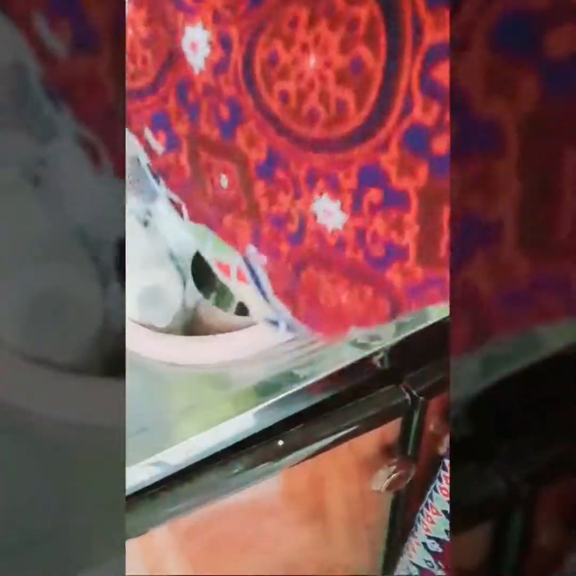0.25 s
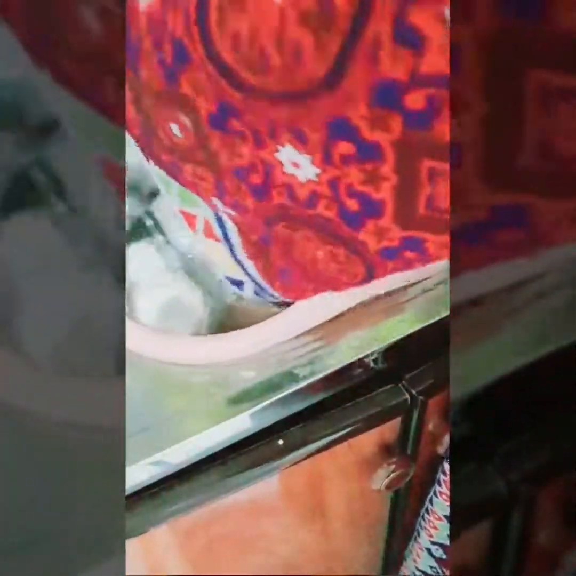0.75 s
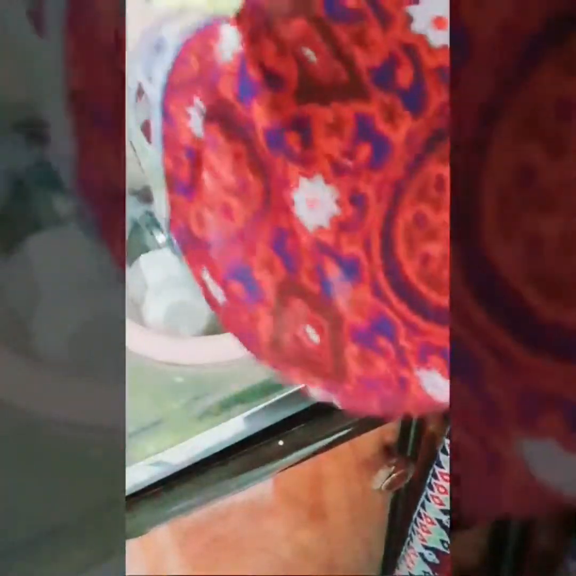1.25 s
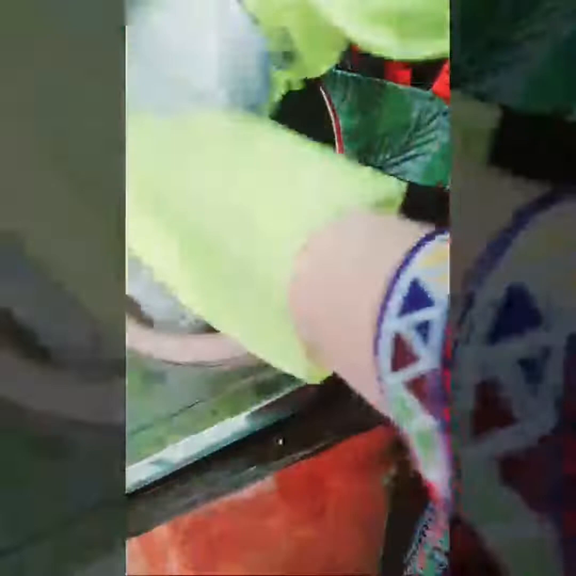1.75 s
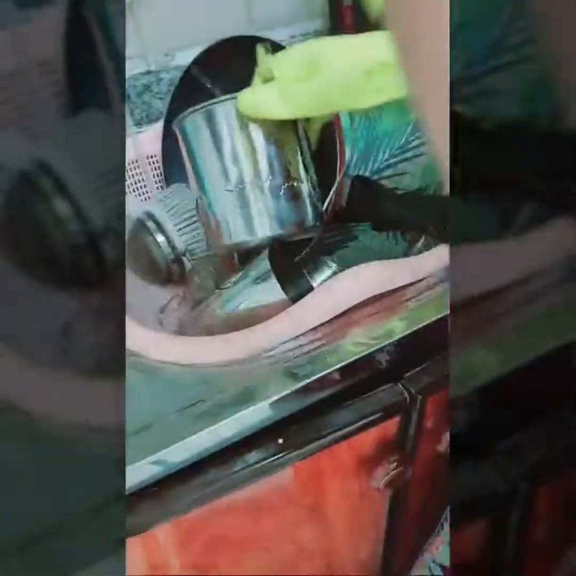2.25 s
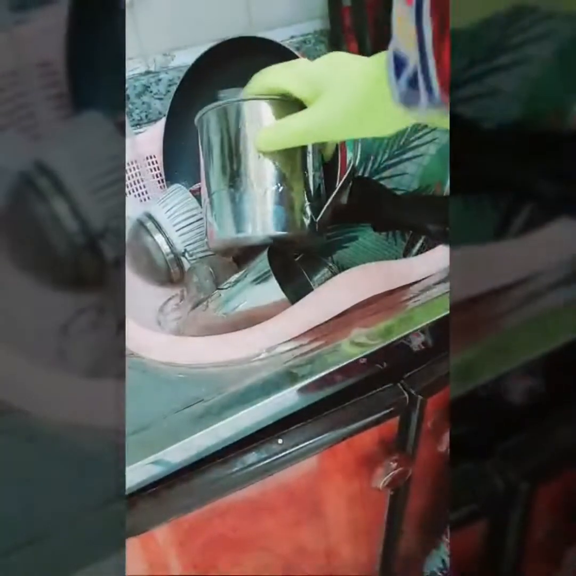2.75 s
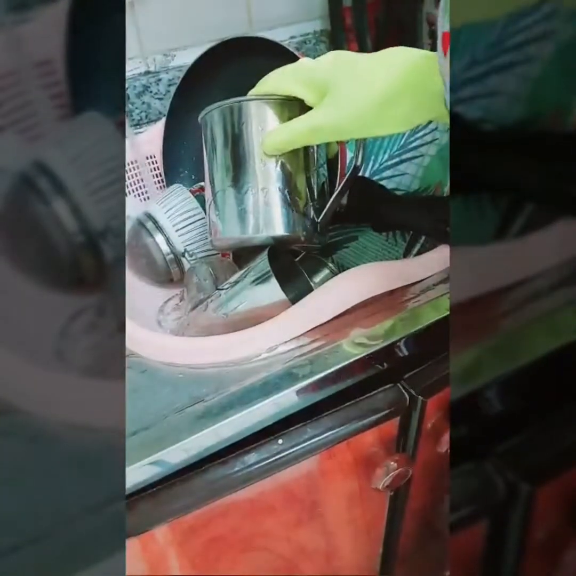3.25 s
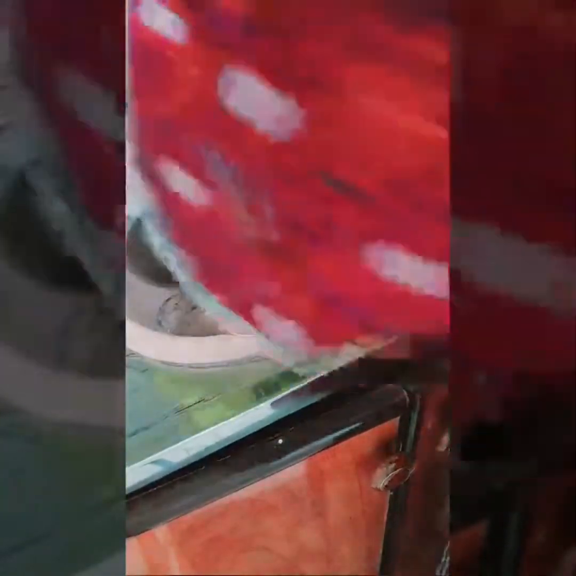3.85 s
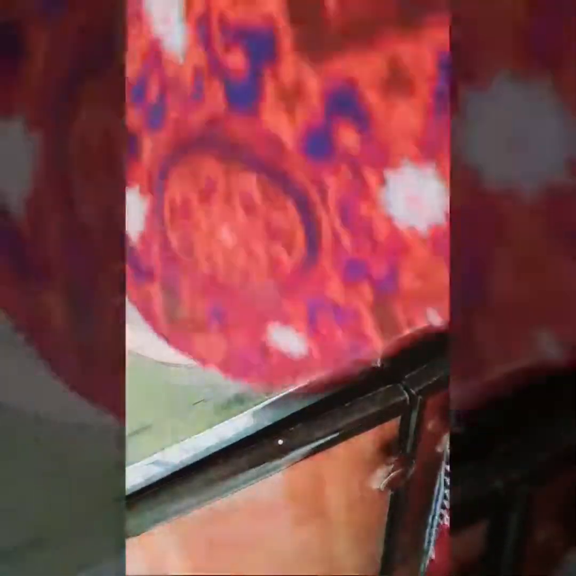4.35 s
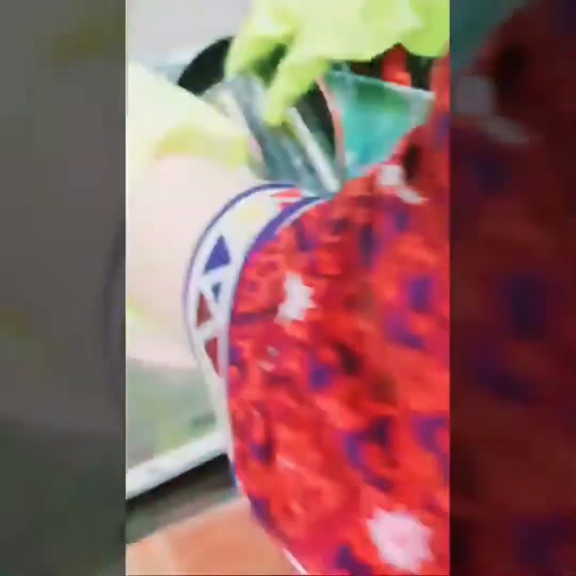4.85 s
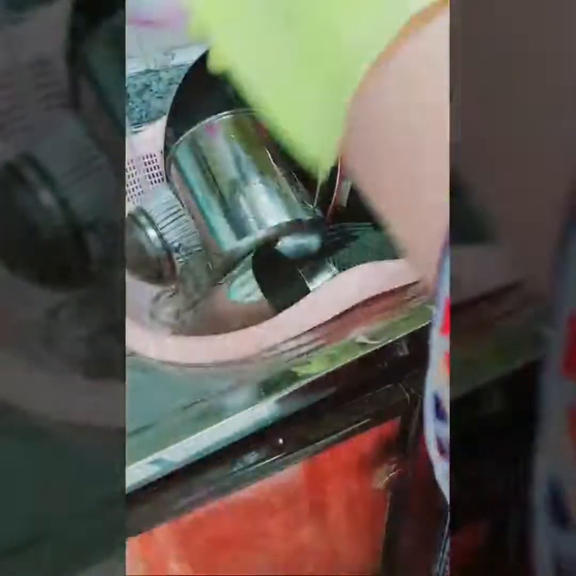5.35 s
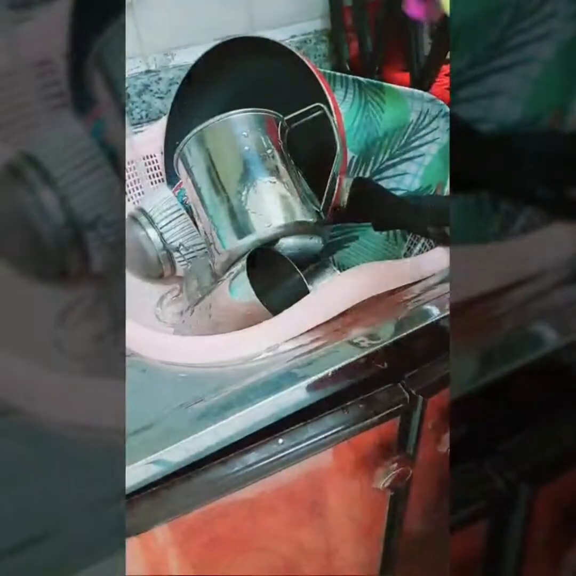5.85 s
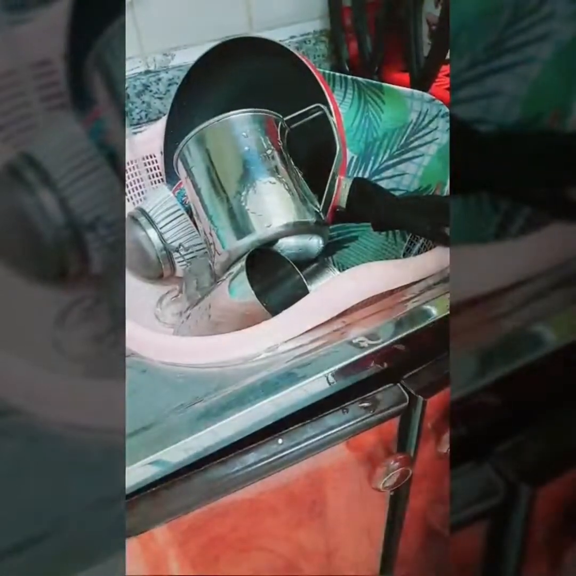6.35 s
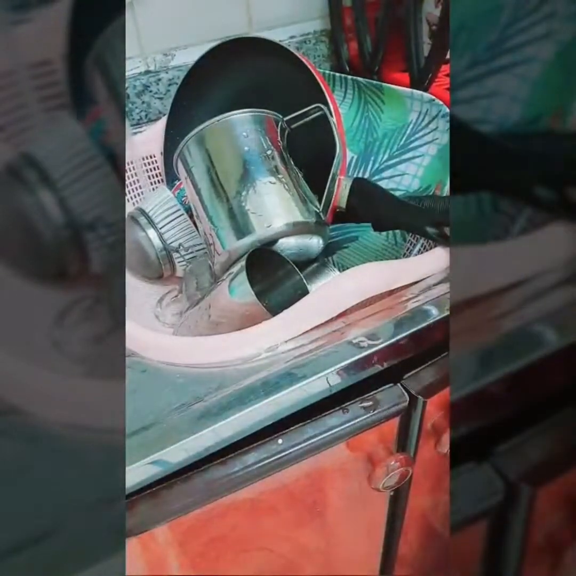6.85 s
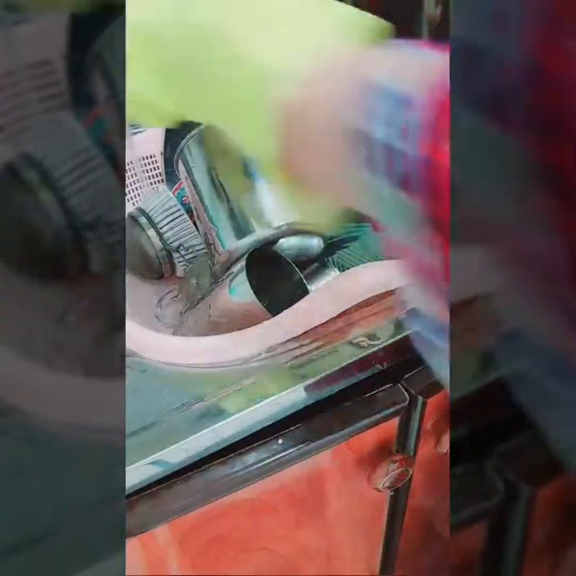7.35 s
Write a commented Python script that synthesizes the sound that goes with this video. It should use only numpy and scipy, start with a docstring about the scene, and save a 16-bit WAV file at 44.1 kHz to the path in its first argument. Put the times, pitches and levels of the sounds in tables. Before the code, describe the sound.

Close in a tiled kitchen, gloved hands stack steel cups, a bowl, a pot and a pan in a plastic rack. Busy clinks and hollow knocks come first, then one hard crash with a lingering lid ring, a short scrape and sparser knocks. Another clatter follows, small ticks as things settle, and a final group of thuddy knocks. Faint room air and fridge hum lie behind, picked up by a two-port phone.

```python
"""A faint drag of steel and a light knock come first; then steel cups, a bowl, a pot and a pan are stacked
in a plastic rack on a kitchen counter. Knocks are bursts of shaped noise plus the ringing modes of the pieces;
small things tick as puffs of noise, and thuds ring the counter. Gloved hands drag steel over steel and scrapes
slide, both built from tiny random clicks. Room air and a humming fridge lie behind, as broad and narrow noise.
The near sounds echo from tiles, and a phone with two ports listens."""
import sys
import numpy as np
from scipy import signal
from scipy.fft import rfft, irfft, next_fast_len
from scipy.io import wavfile
from scipy.ndimage import uniform_filter1d

SR = 44100
rng = np.random.default_rng(int(sys.argv[2]) if len(sys.argv) > 2 else 0)


def int16_out(signal):
    """Quantize to a 16-bit WAV file."""
    q = np.round(np.clip(np.atleast_2d(signal).T, -1, 1) * 32767)
    wavfile.write(sys.argv[1], SR, q.astype(np.int16))


N = 334752  # length in samples


def gain_of(db):
    """Turns dB into amplitude."""
    return 10 ** (np.asarray(db) / 20)


def evened(x):
    """Scales a sound to rms 1."""
    return x / np.sqrt(np.mean(x ** 2) + 1e-20)


def read(points, hz):
    """Reads a table of (Hz, value) at any frequency, with straight lines on a log frequency axis."""
    table_hz, value = np.transpose(points)
    return np.interp(np.log(hz + 1), np.log(table_hz + 1), value)


def add(mix, start_s, sound):
    """Mixes a sound in at its start time, cutting what runs past the end."""
    part = mix[round(start_s * SR):][:len(sound)]
    part += sound[:len(part)]


def colour(x, points):
    """Filters a sound by a spectrum table."""
    size = next_fast_len(x.shape[-1])
    gain = gain_of(read(points, np.fft.rfftfreq(size, 1 / SR)))
    return irfft(rfft(x, size) * gain, size)[..., :x.shape[-1]]


def ring(modes, count=66000):
    """Answer of an object to one tap, count samples long: each mode is a sine that dies away."""
    t = np.arange(count) / SR
    return sum(gain_of(db - 60 * t / t60) * np.sin(2 * np.pi * hz * t) for hz, db, t60 in modes)


def damped(modes, factor):
    """The same modes with their fade times multiplied by factor."""
    return [(hz, db, factor * t60) for hz, db, t60 in modes]


def ramp(count, rise_s):
    """A straight rise from 0 to 1 that then stays at 1."""
    return np.minimum(np.arange(count) / SR / rise_s, 1)


def resonate(x, hz, width):
    """A resonance, width in Hz, whose pitch follows the curve hz."""
    turn = np.exp(2j * np.pi * np.cumsum(hz) / SR)
    r = np.exp(-np.pi * width / SR)
    # shift the pitch down to zero, smooth, and shift back up
    return 2 * (turn * signal.lfilter([1 - r], [1, -r], x / turn)).real


def grit(per_s, spread_db):
    """Clicks of random time, sign and size, about per_s each second; rms 1."""
    size = gain_of(spread_db * np.minimum(rng.exponential(1, N), 4))
    size = size * rng.choice([-1., 1.], N)
    return evened(size * (rng.random(N) < per_s / SR))


def wander(shape, size):
    """A random field of rms 1 over frequency and time, smooth over size = (bins, frames)."""
    field = uniform_filter1d(rng.standard_normal(shape), size[0], axis=0)
    field = uniform_filter1d(field, size[1], axis=1)
    return evened(uniform_filter1d(field, size[1], axis=1))


def streak(x, spread_db, size=(1, 8)):
    """Narrow bands of the sound swell and fade by chance; rms 1."""
    z = signal.stft(x, nperseg=1024, noverlap=768)[2]
    z = z * gain_of(spread_db * np.clip(wander(z.shape, size), -3, 1.8))
    return evened(signal.istft(z, nperseg=1024, noverlap=768)[1][:N])


# Knocks between the pieces. Each row: start in seconds, crash level in dB, sizzle level in dB,
# body level in dB, fade time of the crash in seconds (the time to drop by 60 dB), clink pitch in Hz,
# clink level in dB, pitch of the hollow air in Hz, its level in dB, piece struck, piece it meets, ring level in dB.
KNOCKS = [(.0478, -32.5, -59, -41, 0.29, 3680, -40, 656, -42, "pan", "pot", -52),
          (.179, -32, -44, -31.5, 0.43, 1537, -33, 416, -32, "pot", "cup", -54),
          (0.2455, -28, -48, -25.5, 0.18, 2553, -22, 426, -53, "bowl", "pot", -49),
          (.3057, -21, -32, -41, 0.14, 4170, -32, 622, -24, "pan", "bowl", -49),
          (0.3296, -17, -30, -16.5, 0.28, 2630, -33, 473.5, -13.5, "cup", "pot", -38),
          (.5152, -26.5, -35, -23, 0.18, 2985, -22, 643, -22, "cup", "pot", -36.5),
          (.5581, -35, -52, -12.5, 0.13, 4600, -20, 476, -11, "cup", "bowl", -37),
          (0.605, -19.5, -36, -15.5, 0.21, 4870, -14.5, 523, -40, "bowl", "pot", -25),
          (0.6541, -19, -25.5, -18.5, 0.18, 2510, -19, 437, -42, "bowl", "cup", -23),
          (.768, -44, -47, -17, 0.13, 2530, -16, 466, -29, "bowl", "pot", -41),
          (0.7805, -42, -31, -27.5, 0.22, 2815, -13.5, 353, -17, "bowl", "cup", -22.5),
          (.9213, -36, -59, -43, 0.27, 3330, -35, 640, -39, "pan", "cup", -47),
          (0.9929, -21, -32, -31.5, .18, 4350, -29, 591, -29, "pot", "pan", -44.5),
          (1.0652, -41, -55, -32, 0.074, 3890, -29, 424, -27, "cup", "pan", -48),
          (1.2276, -32, -45, -50, 0.087, 3630, -30, 600, -34, "pan", "cup", -49),
          (1.2486, -27.5, -36, -33.5, 0.16, 3930, -27.5, 608, -22, "cup", "bowl", -43.5),
          (1.528, -32, -56, -34.5, 0.52, 3340, -41, 472, -46, "cup", "pan", -47),
          (1.6117, -30.5, -44, -25, 0.18, 4840, -25, 668, -40, "cup", "pan", -43),
          (1.7134, -48, -59, -25, 0.13, 1524, -45, 396, -36, "bowl", "pan", -55),
          (1.8054, -10.5, -21, -7.5, 0.055, 7760, -17, 645, -36, "pot", "bowl", -33.5),
          (1.8195, -31, -29, -46, 0.17, 3015, -8, 246.7, -16.5, "cup", "pot", -29.5),
          (2.0134, -20, -25.5, -21.5, 0.21, 5465, -21.5, 711, -22.5, "bowl", "pan", -30),
          (2.592, -23.5, -33, -41, 0.56, 1656, -28.5, 410, -39, "pot", "pan", -39),
          (2.7763, -25, -42, -55, 0.28, 3300, -26.5, 516, -34, "pan", "cup", -38),
          (2.9594, -55, -59, -34, 0.34, 2700, -49, 526, -28, "bowl", "cup", -57),
          (3.1494, -34, -46, -24.5, 0.18, 2340, -36, 478, -27.5, "pan", "cup", -50),
          (3.4121, -34.5, -48, -24, 0.28, 1794, -39, 404, -22.5, "pan", "cup", -52),
          (3.5588, -46, -60, -34.5, 0.35, 5540, -50, 458, -30.5, "pot", "cup", -54.5),
          (3.914, -46, -54, -46, 0.14, 3650, -36, 570, -29.5, "pan", "cup", -46),
          (3.9513, -39, -56, -41.5, 1, 3160, -38.5, 540, -40, "cup", "pan", -53),
          (4.0014, -20, -32, -19, 0.25, 1001, -17, 519, -21, "pan", "bowl", -34),
          (4.0679, -24, -36, -27, 0.075, 3680, -21, 560, -27, "cup", "pot", -42),
          (4.5224, -26, -33, -26, .18, 2650, -41, 427, -31, "bowl", "pot", -40.5),
          (4.6841, -28, -39, -31.5, 0.13, 1057, -24, 653, -44, "bowl", "cup", -37.5),
          (4.8066, -20.5, -29, -17.5, 0.22, 2820, -24, 1014, -19, "bowl", "cup", -30),
          (4.822, -17, -24, -28.5, 0.14, 5572, -10.5, 476, -19, "cup", "bowl", -37),
          (4.9965, -24, -34.5, -27, 0.28, 2760, -29.5, 659, -17.5, "pot", "cup", -47),
          (5.0397, -23.5, -39, -40, 0.15, 5170, -20, 738, -31, "cup", "pan", -39),
          (5.1194, -50, -61, -29.5, 0.15, 3070, -31, 460, -21, "cup", "bowl", -54),
          (5.2369, -18.5, -27.5, -20.5, 0.3, 3365, -19, 461.6, -16, "pot", "pan", -34),
          (5.3254, -37, -66, -59, 0.18, 3365, -20, 479, -24.5, "pan", "cup", -37),
          (6.0739, -37.5, -53, -36, 0.5, 3030, -42, 468, -37, "pan", "pot", -51),
          (6.6179, -41, -51, -59, 0.2, 3470, -39, 736, -60, "pot", "pan", -55.5),
          (6.6728, -38, -49, -62, 0.5, 3190, -42, 543, -57, "pot", "bowl", -54),
          (6.7197, -12, -30, -10, 0.13, 1770, -14.5, 424, -17, "pan", "cup", -42),
          (6.835, -26, -55, -21.5, 0.23, 2260, -31, 453, -22.5, "bowl", "cup", -40),
          (6.919, -34.5, -57, -28.5, 0.39, 2184, -36, 362, -25, "bowl", "pan", -40),
          (6.959, -41, -50, -26.5, 0.21, 3310, -34.5, 396, -19, "cup", "bowl", -49)]
# The ringing pitches (modes) of each piece when tapped. Each row: pitch in Hz, level in dB, fade time in seconds.
BOWL = [(1400, -35, 0.34), (2230, -13, 0.36), (2535, -4.5, 0.37), (2850, -5.5, 0.49), (4100, -6, 0.089),
        (4840, -2.5, 0.22), (6200, -40, .4), (6498, -40, .5), (7111, -37, .5), (7150, -2, 0.2),
        (7640, -7, 0.24), (8414, -38, 0.46)]
CUP = [(242.2, -5.5, 0.2), (650, -5, 0.79), (970, -32, .15), (2848, 7.5, 0.18), (3065, 10, 0.075),
       (3700, -44, 0.39), (4280, -22, 0.53), (4770, 7.5, 0.081), (5650, -20, .15), (7600, 2, 0.13),
       (7704, -17, .3), (8274, -33, 0.27)]
POT = [(885, 0, 0.16), (1750, -4, 0.23), (2497, -3, 0.062), (2630, -19, 0.16), (3680, -2, 0.18),
       (3670, 3.5, 0.18), (4440, -11, 0.12), (5230, 14.5, 0.037), (5520, 11, 0.1), (5766, 10, 0.12),
       (6954, 11, 0.11), (7600, 2, 0.29), (7450, 9, 0.22), (7800, -6.5, 0.11)]
PAN = [(464, -11.5, 0.98), (1040, -22, .26), (1845, -5.5, 0.29), (2680, -33, 0.24), (3350, 6, 0.23),
       (4010, -0.5, 0.25), (5070, -25, .18), (5270, -30, 0.18), (6708, -13, .2), (7320, -7, 0.059),
       (7660, -16, .18), (9100, -4, .14)]
# Relative loudness of the crash, sizzle and body noise. Each row: frequency in Hz, level in dB per Hz.
CRASH = [(710, -37), (1200, -27), (1600, -8), (1760, -6.5), (2180, -13), (2680, 0.5), (4490, -4.5),
         (5370, -2.5), (6230, -10), (7400, -9.5), (8500, -32.5), (11000, -49), (18700, -120)]
SIZZLE = [(4710, -34), (8000, 6), (8710, -8.5), (11400, 3.5), (13100, 0.5), (13500, -25)]
BODY = [(120, -15), (200, -29), (306, -19), (458, -10), (890, -17), (980, -16.5), (2000, -24),
        (2600, -26.5), (4400, -120)]
KNOCK_RISE_S, HOLLOW_T60_S = 0.003, 0.23
MET_DB = -9.5  # the piece that is met rings weaker


def knocks():
    """A crash and a duller body of streaky noise, a clink, the air in a vessel and the ringing pieces."""
    steel = streak(rng.standard_normal(N), 7.9, size=(2, 12))
    dull = streak(rng.standard_normal(N), 4.)
    crash, sizzle = evened(colour(steel, CRASH)), evened(colour(steel, SIZZLE))
    body = evened(colour(dull, BODY))
    pieces = {"bowl": BOWL, "cup": CUP, "pot": POT, "pan": PAN}
    out = np.zeros(N)
    taps = {name: np.zeros(N) for name in pieces}
    t = np.arange(SR // 2) / SR
    grow = 1 - np.exp(-t / KNOCK_RISE_S)  # each knock swells in smoothly over a few milliseconds
    chance = rng.random((len(KNOCKS), 2, 5))
    for row, (when, sign) in zip(KNOCKS, chance):
        s, crash_db, sizzle_db, body_db, t60, clink_hz, clink_db, hollow_hz, hollow_db, struck, met, ring_db = row
        at = round(s * SR)
        span = slice(at, at + len(t))
        fall_db = -60 * t / max(t60, .02)
        bright = gain_of(crash_db) * crash[span] + gain_of(sizzle_db) * sizzle[span]
        sound = grow * gain_of(fall_db) * bright
        # the body fades a little slower than the crash
        sound += ramp(len(t), 0.0045) * gain_of(body_db + 0.87 * fall_db) * body[span]
        sound += grow * ring([(clink_hz, clink_db, 0.92 * t60)], count=len(t))
        sound += ramp(len(t), 0.012) * ring([(hollow_hz, hollow_db, HOLLOW_T60_S)], count=len(t))
        add(out, s, sound)
        # one blow and four weaker bounces, all within 10 ms
        contact = s + when * .01 * np.arange(5) / 4
        sizes = np.where(sign < .5, -1, 1) * 0.66 ** np.arange(5)
        for moment, size in zip(contact, sizes):
            taps[struck][round(moment * SR)] += size * gain_of(ring_db)
            taps[met][round(moment * SR)] += size * gain_of(ring_db + MET_DB)
    for name, modes in pieces.items():
        out += signal.oaconvolve(taps[name], ring(modes))[:N]
    return out


# The ringing pitches of the lid. Each row: pitch in Hz, level in dB, fade time in seconds.
LID = [(1401, -9.5, 4.6), (1380, -1, 0.99), (3892, 10.5, 0.52)]
# Taps on the lid. Each row: start in seconds, level in dB.
LID_TAPS = [(1.83, -49), (2.029, -39.5)]
LID_HELD_S = 2.58  # a hand stops the lid


def lid_taps():
    """The lid's modes swell in softly and ring on until a hand stops them."""
    out = np.zeros(N)
    for s, db in LID_TAPS:
        lid = ring(LID, count=round((LID_HELD_S - s) * SR))
        stop = ramp(len(lid), .03)[::-1]
        add(out, s, gain_of(db) * lid * stop * ramp(len(lid), 0.027))
    return out


# Soft thuds into the counter. Each row: start in seconds, level in dB, main pitch in Hz.
THUDS = [(.044, -35, 88.9), (0.182, -28.5, 82.5), (0.322, -23, 117), (.549, -20, 77), (0.599, -16, 81),
         (0.654, -17, 82), (0.762, -19.5, 107), (1.611, -23.5, 114), (1.718, -20.5, 131),
         (1.805, -11.5, 95), (2.014, -16, 131), (2.02, -25, 251.5), (2.956, -23.5, 156.6),
         (3.149, -14.5, 134), (3.409, -12, 124), (3.569, -31, 194), (4.002, -42, 118), (4.068, -24.5, 119),
         (4.333, -32, 109.7), (4.456, -18.5, 73.4), (4.811, -17.5, 107.4), (4.82, -19.5, 323),
         (4.992, -33, 185), (5.116, -34, 85), (5.258, -18.5, 107), (5.27, -24, 285), (5.446, -33, 85.5),
         (6.062, -25.5, 65), (6.187, -22, 125.6), (6.716, -18, 134), (6.841, -15, 157), (6.92, -13, 183),
         (6.959, -12.5, 122)]
# The ringing pitches of the counter, also used under the hands.
# Each row: pitch in Hz, level in dB, fade time in seconds.
COUNTER = [(76.5, -2.5, 0.23), (119.6, 3.5, 0.17), (193.2, -6.5, 0.21), (264.3, -8, 0.2), (352, -7.5, 0.33)]
THUD_RING_CYCLES = 18  # cycles to die by 60 dB, but never sooner than 0.17 s
COUNTER_DB = -8  # level of the counter's modes under a thud


def thuds():
    """Soft blows ring the counter, each favouring its own low pitch; the lowest last longer."""
    out, blows = np.zeros(N), np.zeros(N)
    push = signal.windows.hann(120)
    for s, db, hz in THUDS:
        own = ring([(hz, db, max(THUD_RING_CYCLES / hz, .17))], count=30000)
        add(out, s, own * ramp(len(own), 0.0056))
        add(blows, s, gain_of(db + COUNTER_DB) * push / push.sum())
    return out + signal.oaconvolve(blows, ring(COUNTER))[:N]


# The pot scraped along the pan. Each row: start in seconds, length in seconds, level in dB,
# pitch of the hollow air at the start in Hz, at the end in Hz, level of the hollow air in dB.
SCRAPES = [(2.528, 0.305, -32.5, 492, 535, -30.5), (3.9, .08, -50, 570, 590, -41),
           (4.975, 0.106, -28, 660, 500, -35.5)]
SCRAPE_RISE_S, SCRAPE_FALL_DB_PER_S = 0.055, 500


def scrapes():
    """Stick-slip clicks drive the damped modes of pot and pan and the air inside the pot."""
    slips, out = grit(900, 6.8), np.zeros(N)
    steel = evened(signal.oaconvolve(slips, ring(damped(POT + PAN, .5)))[:N])
    hiss = evened(colour(streak(grit(5400, 3.7), 4.7), CRASH))
    steel = evened(steel + 0.88 * hiss)
    slow = uniform_filter1d(rng.standard_normal(N), size=1500)
    rocking = 1 + 0.026 * evened(uniform_filter1d(slow, size=1500))  # sways the hollow pitch
    t = np.arange(SR // 2) / SR
    for s, length, db, first_hz, last_hz, hollow_db in SCRAPES:
        fall_db = -SCRAPE_FALL_DB_PER_S * np.maximum(t - length, 0)
        shape = ramp(len(t), SCRAPE_RISE_S) * gain_of(fall_db)
        part = slice(round(s * SR), round(s * SR) + len(t))
        hollow_hz = np.interp(t, (0, length), (first_hz, last_hz)) * rocking[part]
        hollow = evened(resonate(slips[part], hollow_hz, 17.0))
        add(out, s, shape * (gain_of(db) * steel[part] + gain_of(hollow_db) * hollow))
    return out


# Light ticks of small parts settling. Each row: start in seconds, level in dB, pitch in Hz.
TICKS = [(2.374, -41, 5370), (2.4394, -46, 2430), (3.3778, -36, 6200), (3.852, -40.5, 3340),
         (4.2627, -40.5, 3560), (5.663, -30.5, 6600), (5.7563, -33.5, 6500), (5.8522, -41.5, 2550),
         (5.9245, -31.5, 6260), (5.9778, -33, 6200), (6.003, -31, 6700), (6.331, -32, 6640),
         (6.3484, -35, 6900), (6.449, -45, 7140), (6.472, -31.5, 6360), (7.049, -47, 3750),
         (7.112, -38.5, 7000), (7.293, -44, 2370), (7.394, -37, 3960)]
TICK_T60_S = 0.13


def ticks():
    """Short bright puffs: noise in a wide resonance around one pitch."""
    out, t = np.zeros(N), np.arange(SR // 4) / SR
    noise = rng.standard_normal((len(TICKS), len(t)))
    for (s, db, hz), row in zip(TICKS, noise):
        pitch = np.full(len(t), hz)
        puff = resonate(row, pitch, 0.33 * hz)
        puff = evened(resonate(puff, pitch, 0.33 * hz))
        add(out, s, gain_of(db - 60 * t / TICK_T60_S) * puff * ramp(len(t), 0.0018))
    return out


# Light touch of the gloved hands, gliding from row to row. Each row: time in seconds, drag level in dB.
HANDS = [(0.0, -42.5), (1.0, -48), (1.27, -47.5), (1.54, -48), (2.3, -49), (2.85, -46), (3.15, -47),
         (3.74, -40), (4.1, -55.5), (4.35, -42.5), (5.47, -41.5), (5.9, -46.5), (6.09, -44), (7.38, -43),
         (7.59, -49)]
# Shoves of the pile. Each row: time in seconds when the shove reaches its full level, hold in seconds,
# level of steel dragged on steel in dB, rumble level of the counter in dB.
SHOVES = [(0.107, 0.022, -39.5, -57), (0.41, 0.11, -51, -28), (0.543, 0.14, -32, -41),
          (0.754, 0.056, -25.5, -25), (1.585, 0.11, -38, -34.5), (1.828, 0.02, -31, -25),
          (2.07, 0.025, -36.5, -42), (3.146, 0.033, -42, -32.5), (3.536, 0.051, -63, -28.5),
          (4.452, 0.049, -42.5, -60), (4.918, 0.16, -32.5, -37.5), (5.22, 0.1, -42, -46),
          (6.074, .16, -47.5, -33), (6.915, 0.099, -48, -20)]
# Relative loudness of the drag. Each row: frequency in Hz, level in dB per Hz.
DRAG = [(240, -2.5), (400, -2), (587, -4), (799, -5), (1620, -11.5), (1820, -7.5), (3430, -4.5), (4470, -7),
        (4820, -5.5), (7490, -12.5), (9760, -24.5), (12500, -19), (13500, -23)]
SHOVE_RISE_DB_PER_S, SHOVE_FALL_DB_PER_S = 217, 158


def hands():
    """Fine grit of steel sliding on steel; the counter grumbles under shifting weight."""
    t = np.arange(N) / SR
    sliding = gain_of(np.interp(t, *np.transpose(HANDS)))
    weight = np.zeros(N)
    for s, hold, drag_db, rumble_db in SHOVES:
        rise_db = -SHOVE_RISE_DB_PER_S * np.maximum(s - t, 0)
        fall_db = -SHOVE_FALL_DB_PER_S * np.maximum(t - s - hold, 0)
        shape = gain_of(rise_db + fall_db)
        sliding = sliding + gain_of(drag_db) * shape
        weight = weight + gain_of(rumble_db) * shape
    drag = evened(colour(streak(grit(6000, 1.5), 9.6, size=(2, 8)), DRAG))
    rumble = evened(signal.oaconvolve(grit(150, 3.0), ring(damped(COUNTER, 0.4)))[:N])
    return drag * sliding + rumble * weight


# How fast the tiled room falls silent. Each row: frequency in Hz, fade time in seconds.
TILES = [(200, 0.5), (1000, 0.28), (4000, 0.24), (12000, 0.065)]
ROOM_DB = -10.5  # level of the echoes


def echoes():
    """Sparse taps of random sign, each band dying at its own speed."""
    taps = np.zeros(SR // 2)
    at = np.arange(100, len(taps) - 20, 20)
    taps[at + rng.integers(0, 20, len(at))] = rng.choice([-1., 1.], len(at))
    hz, t, z = signal.stft(taps, SR, nperseg=128)
    fade = gain_of(-60 * t / read(TILES, hz)[:, None])
    tail = signal.istft(z * fade, SR, nperseg=128)[1]
    return tail / np.linalg.norm(tail)


# Relative loudness of the room air. Each row: frequency in Hz, level in dB per Hz.
AIR = [(15, -44), (25, -24), (91, 7.5), (175, -18), (418, -20), (708, -42), (807, -13), (897, -21.5),
       (2200, -20.5), (3090, -11.5), (4590, -18.5), (7370, -15), (9590, -30), (11800, -20.5), (13500, -33)]
AIR_DB = -44
# The hum of the fridge. Each row: pitch in Hz, rms level in dB.
FRIDGE = [(100, -59), (803, -61.5)]


def kitchen():
    """Room air as shaped noise, and the slightly wavering hum of a fridge as narrow bands of noise."""
    white = rng.standard_normal(N)
    hum = sum(gain_of(db) * evened(resonate(white, np.full(N, hz), 9.8)) for hz, db in FRIDGE)
    air = evened(colour(streak(rng.standard_normal(N), 4.5, size=(3, 8)), AIR))
    return gain_of(AIR_DB) * air + hum


# How much the two ports differ. Each row: frequency in Hz, dB of the turned difference over the sum.
APART = [(60, -35), (150, -22.5), (370, -10), (910, -1.5), (2250, 2.5), (5570, 1.5), (13800, 2.5)]


def ports(x):
    """Above the bass the two ports hear the moving dishes by different paths: the phase between them wanders."""
    z = signal.stft(x, nperseg=256)[2]
    turn = 2.44 * wander(z.shape, size=(3, 9))  # radians
    turned = signal.istft(z * np.exp(1j * turn), nperseg=256)[1][:N]
    apart = colour(turned, APART) + 0.039 * x
    return np.array([x + apart, x - apart])


def scene():
    """All sources in the room; only the near ones get echoes."""
    near = knocks() + lid_taps() + ticks() + thuds() + scrapes()
    room = gain_of(ROOM_DB) * signal.oaconvolve(near, echoes())[:N]
    return ports(near + room + hands() + kitchen())


BASS_END_HZ, POLES = 61, 4
TREBLE_END_HZ, EDGE_HZ = 13040, 14390


def record(dry):
    """The bass rolls off, loud peaks round off, the treble ends; then the band limit."""
    bass_cut = signal.butter(POLES, BASS_END_HZ, "high", fs=SR, output="sos")
    soft = 1.091 * np.tanh(signal.sosfilt(bass_cut, dry) / 1.055)
    treble_end = signal.firwin(101, TREBLE_END_HZ, window=("kaiser", 4), fs=SR)
    soft = signal.oaconvolve(soft, treble_end[None], "same")
    band_limit = signal.firwin(511, EDGE_HZ, window=("kaiser", 9), fs=SR)
    return signal.oaconvolve(soft, band_limit[None], "same")


dry = scene()
out = record(dry)
int16_out(out)
```